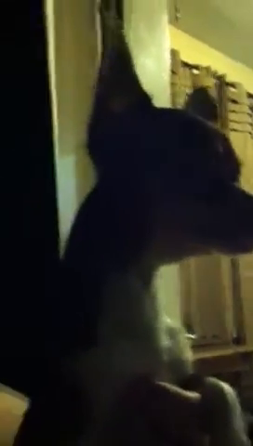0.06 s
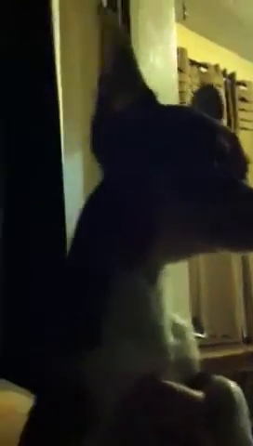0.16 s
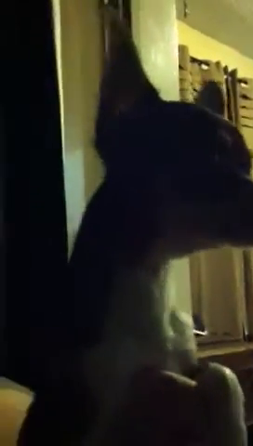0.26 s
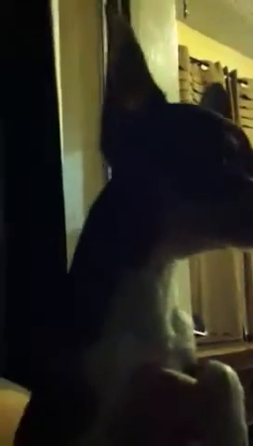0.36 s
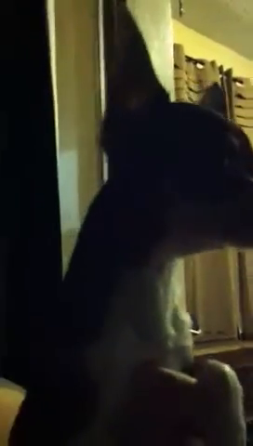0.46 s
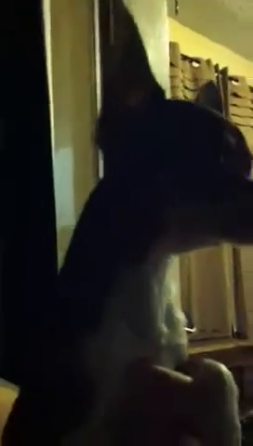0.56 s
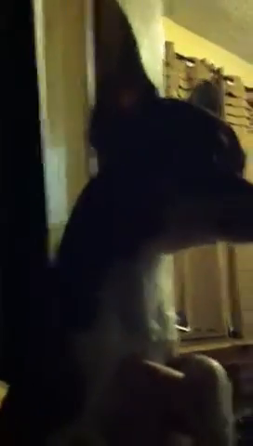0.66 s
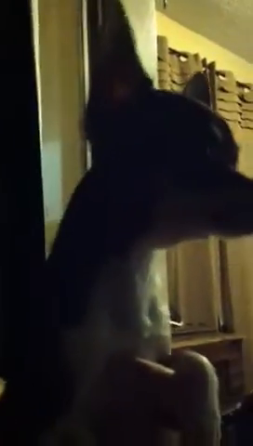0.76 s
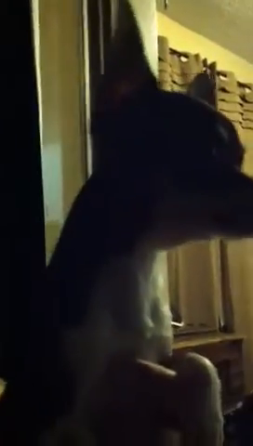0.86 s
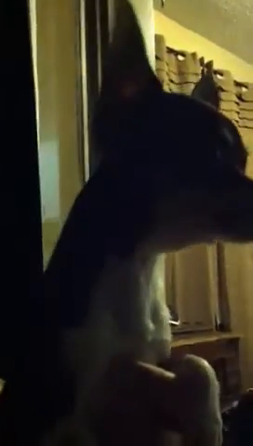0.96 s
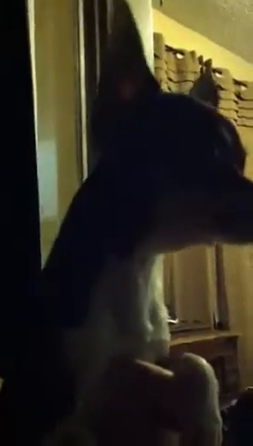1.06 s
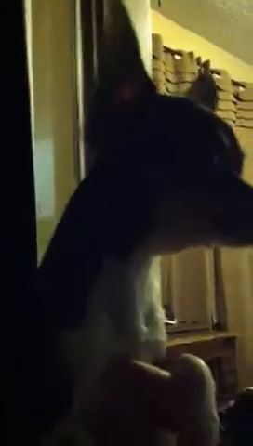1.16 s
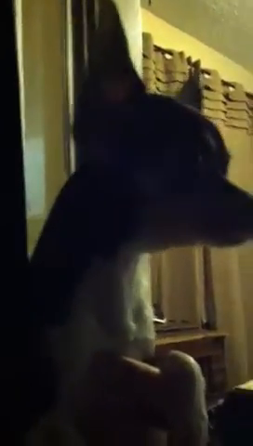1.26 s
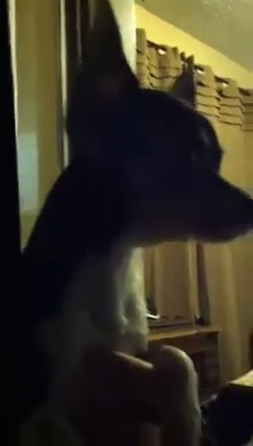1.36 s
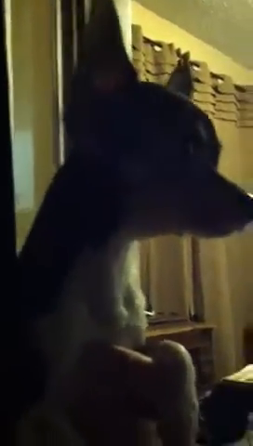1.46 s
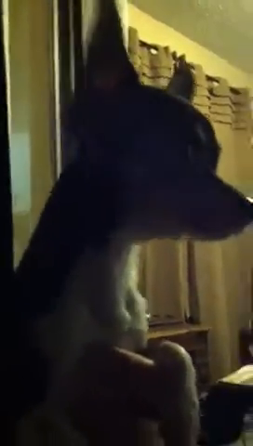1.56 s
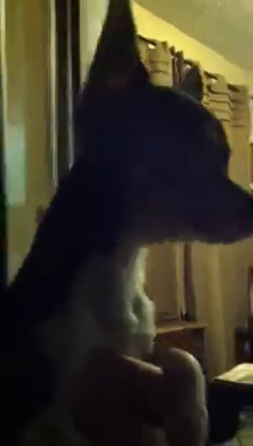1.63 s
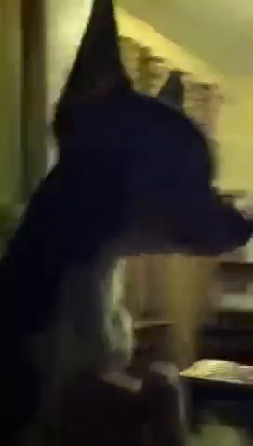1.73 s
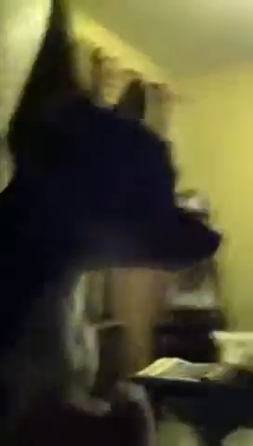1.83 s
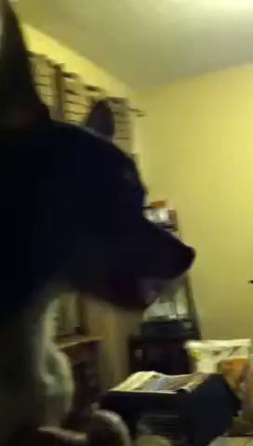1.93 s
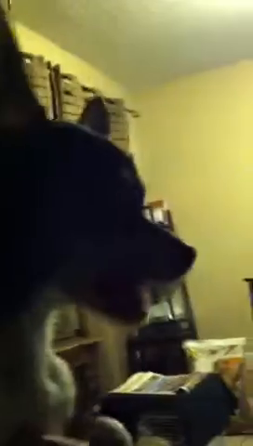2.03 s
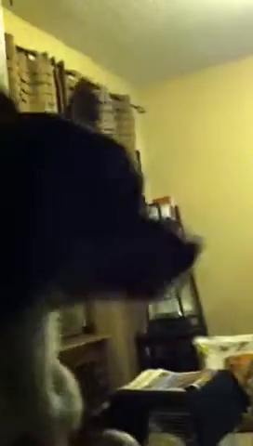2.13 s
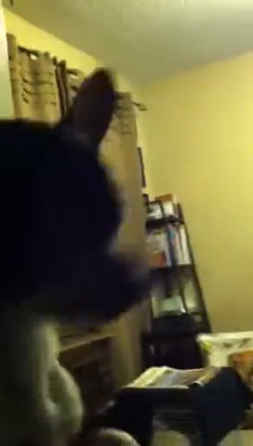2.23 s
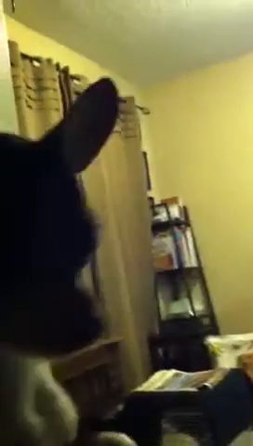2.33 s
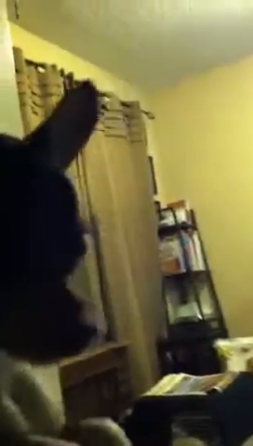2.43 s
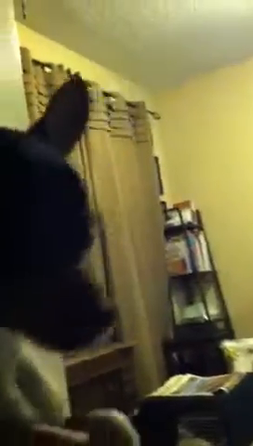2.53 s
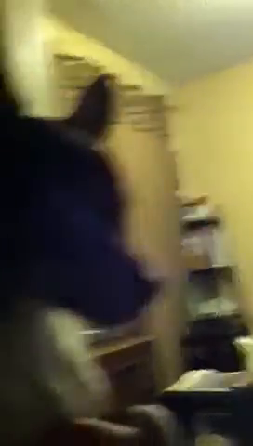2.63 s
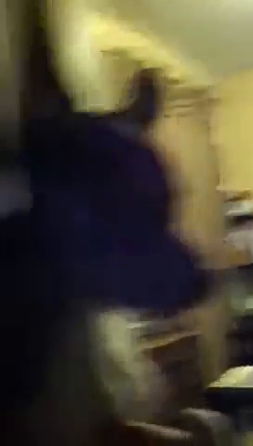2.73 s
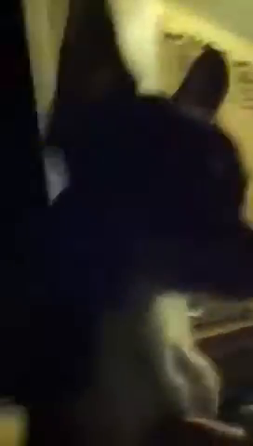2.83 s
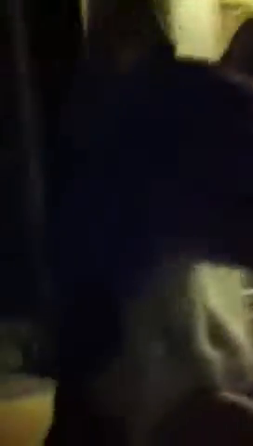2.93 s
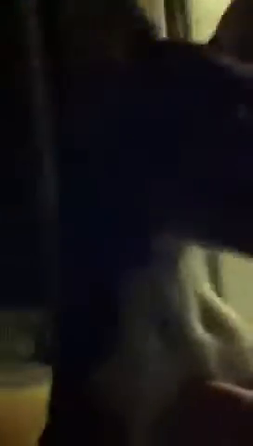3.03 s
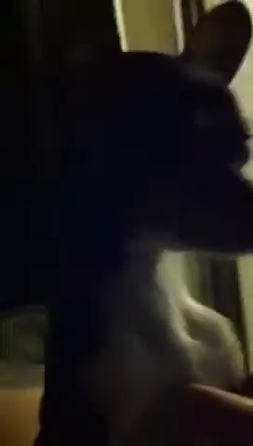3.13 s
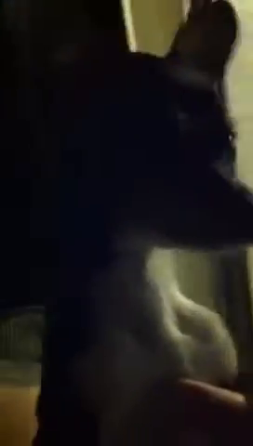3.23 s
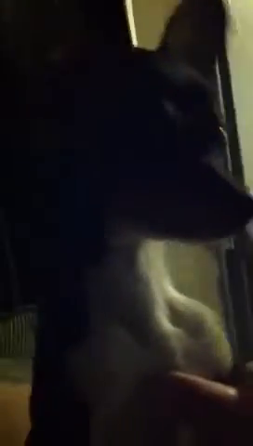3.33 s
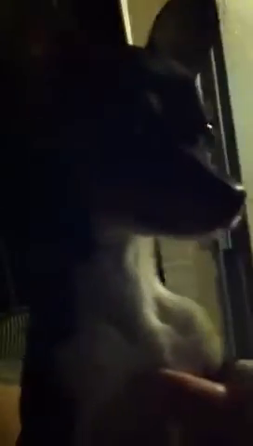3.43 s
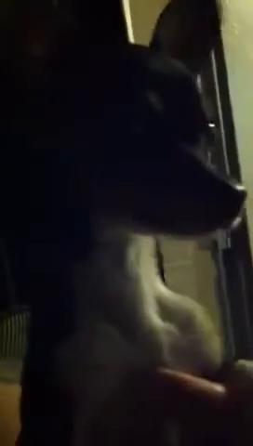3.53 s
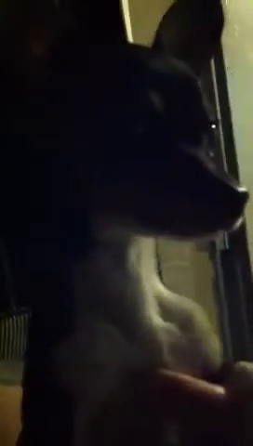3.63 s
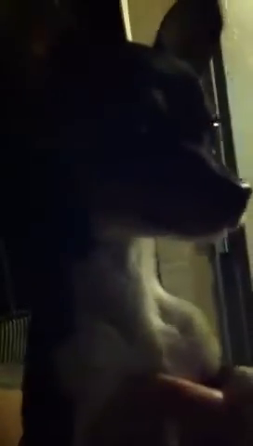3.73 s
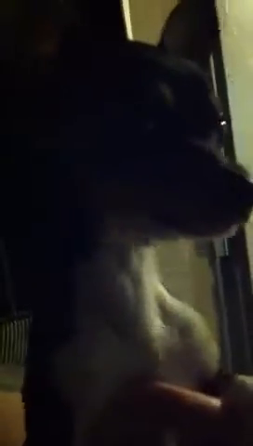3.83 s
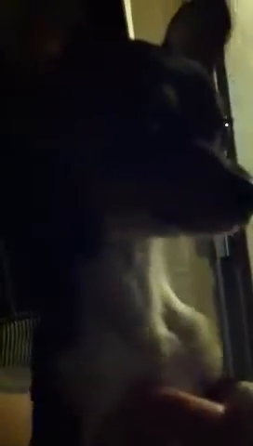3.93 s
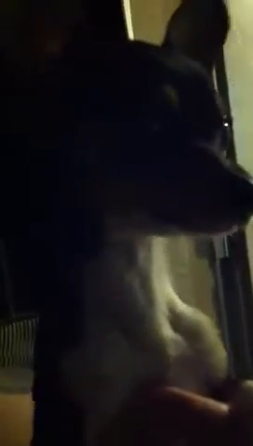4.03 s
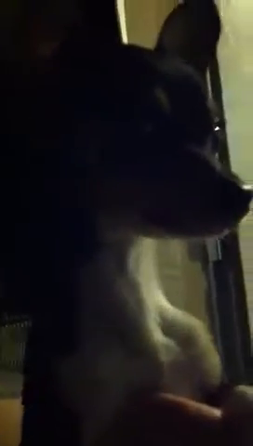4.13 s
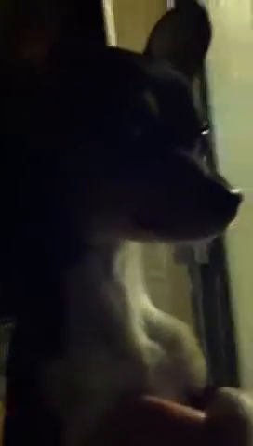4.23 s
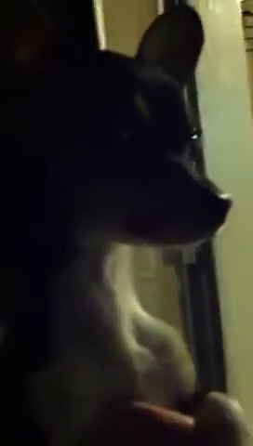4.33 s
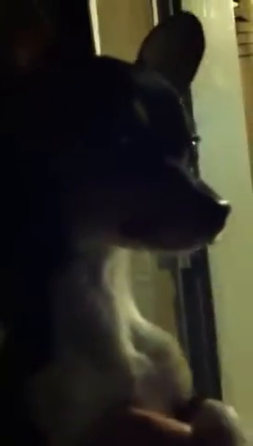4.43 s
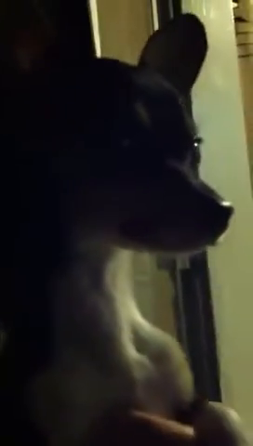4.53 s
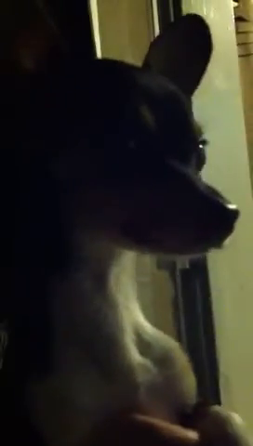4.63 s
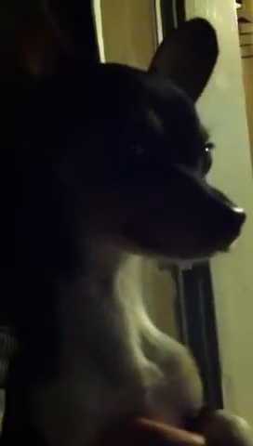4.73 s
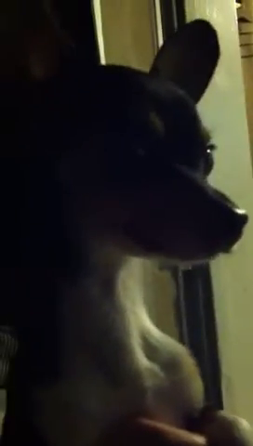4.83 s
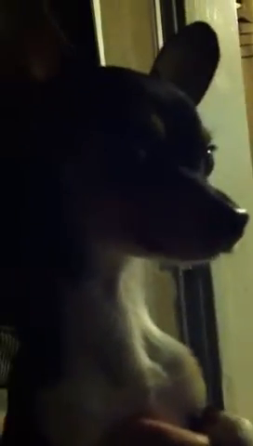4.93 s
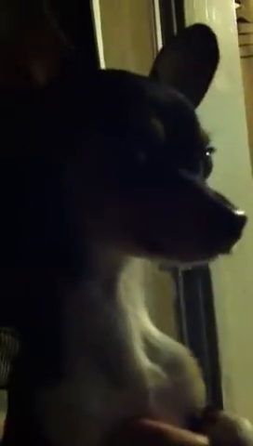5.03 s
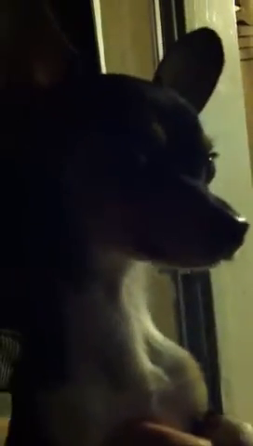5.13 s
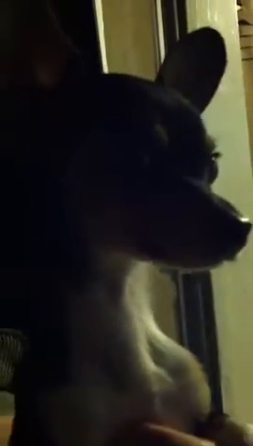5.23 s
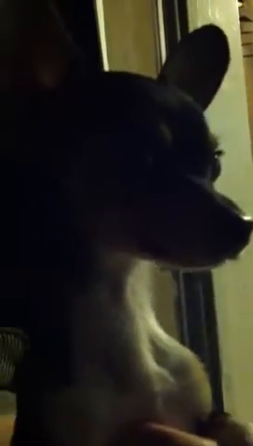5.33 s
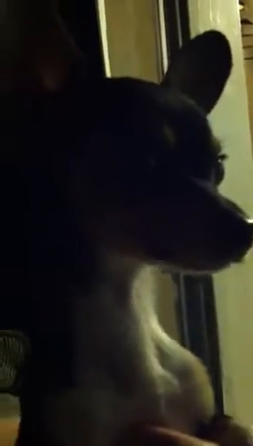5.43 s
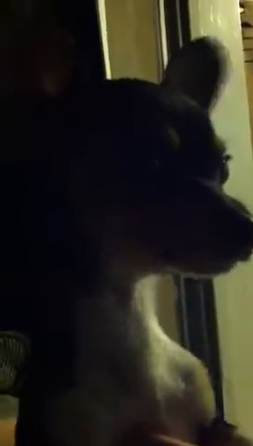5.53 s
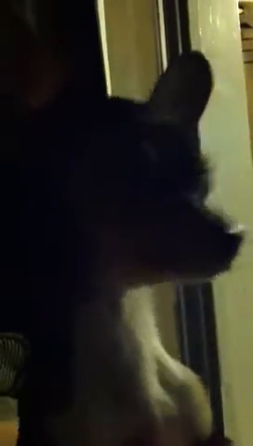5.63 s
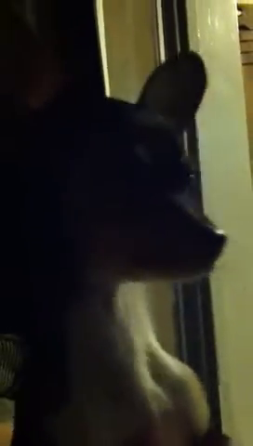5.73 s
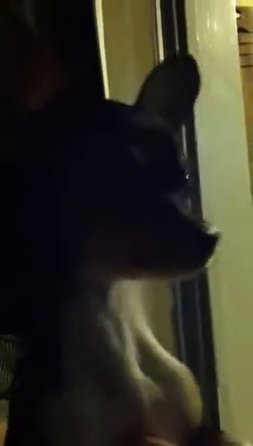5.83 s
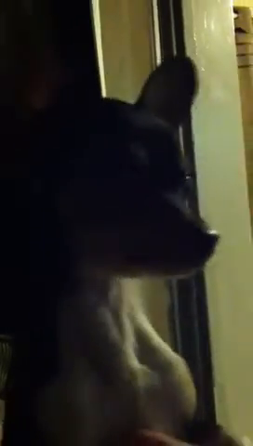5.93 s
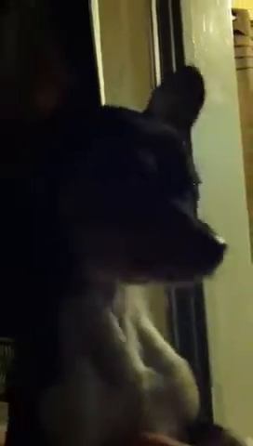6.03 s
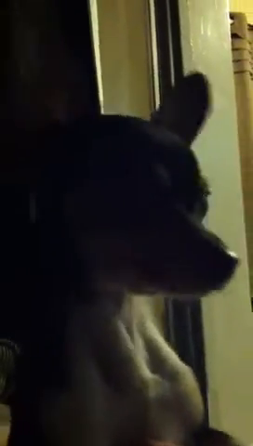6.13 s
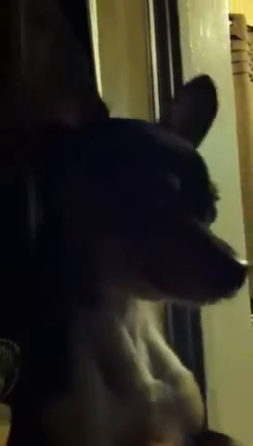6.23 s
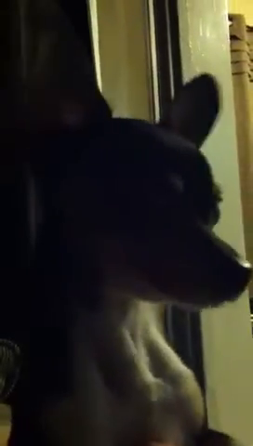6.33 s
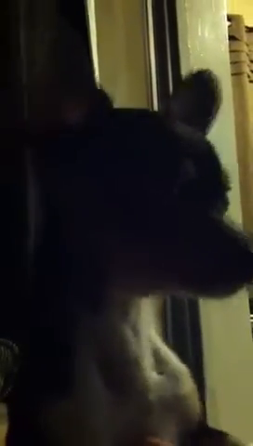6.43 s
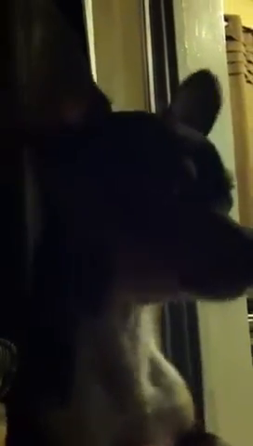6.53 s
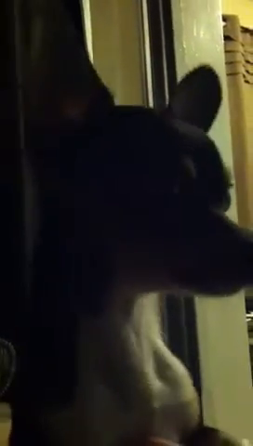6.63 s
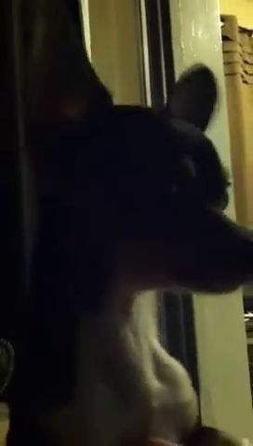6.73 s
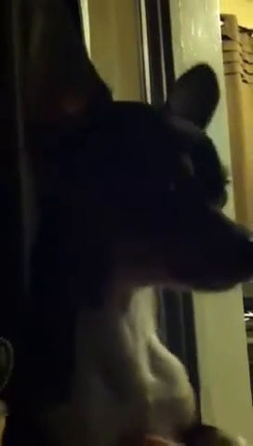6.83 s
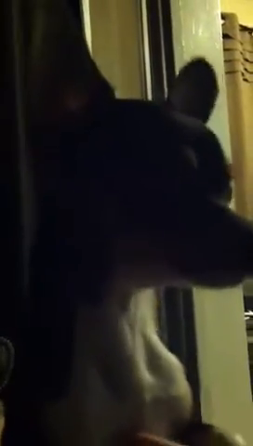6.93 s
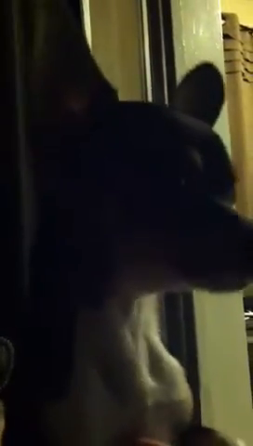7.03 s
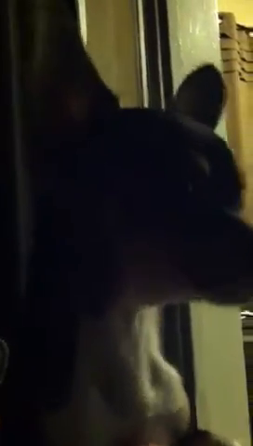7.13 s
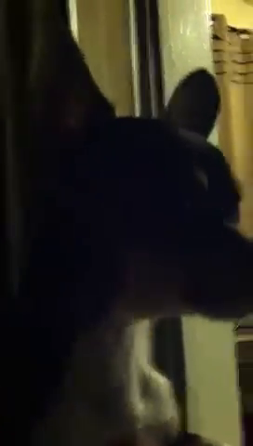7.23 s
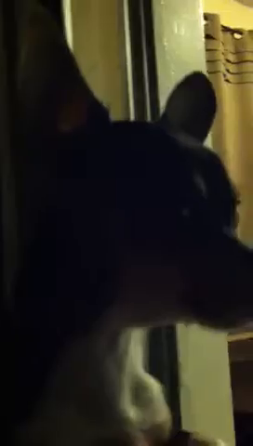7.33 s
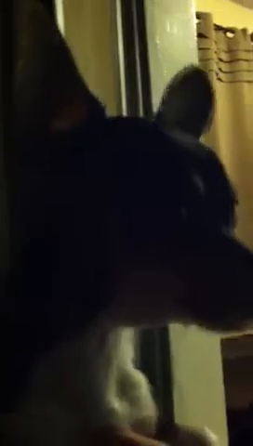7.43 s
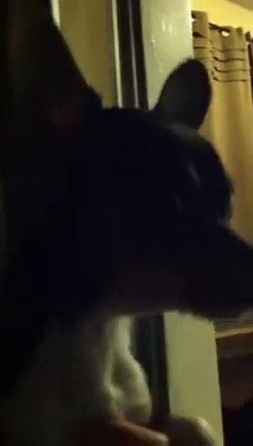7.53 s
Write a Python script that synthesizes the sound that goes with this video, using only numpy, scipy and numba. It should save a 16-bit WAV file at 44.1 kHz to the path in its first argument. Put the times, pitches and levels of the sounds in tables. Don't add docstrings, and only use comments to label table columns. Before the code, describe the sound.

Close, dry indoor sound of a small dog: a throaty growl fluttering about 25 times a second, then isolated muffled woofs with breathy ends and faint lip smacks in the gaps. The third and fourth woofs are higher and sharper, and the fourth runs almost straight into another growl. Soft room hiss and a distant appliance hum lie underneath.

```python
import sys
import numpy as np
from scipy import signal
from scipy.fft import rfft, irfft, next_fast_len
from scipy.io import wavfile
from scipy.ndimage import uniform_filter1d
from numba import njit

SR = 44100
rng = np.random.default_rng(int(sys.argv[2]) if len(sys.argv) > 2 else 0)


def ratio_of_db(decibels):
    return 10 ** (np.asarray(decibels, float) / 20)


def generate_wav(signal):
    frames = np.transpose(np.atleast_2d(signal))
    scaled = np.clip(frames, -1, 1) * 32767
    pcm = np.round(scaled).astype(np.int16)
    wavfile.write(sys.argv[1], SR, pcm)


N = 334278

# frequency in Hz, level in dB.
AIR_SPECTRUM = [(15, -52), (25, -44), (86, -21), (110, -14.5), (160, -13), (193, -2), (221, -5.5),
                (358, -7), (388, -10), (482, -9), (740, -8.5), (969, -12.5), (1170, -9.5), (3000, -17),
                (15500, -43)]
AIR_DB = -59.5
# frequency in Hz, level in dB.
APPLIANCE_TONES = [(118.4, -75), (193.8, -80), (387.6, -71), (452.2, -72.5), (732.1, -75), (1136, -73.5)]

# time in seconds, closures per second.
FLAPPING = [
    [(0, 25.84), (.25, 25.95), (.4, 22.18), (.7, 26.46), (1.34, 20.89)],
    [(6.604, 25.95), (7, 29.72), (7.1, 25.89), (7.3, 28.97), (7.58, 22.16)],
]
FIRST_CLOSURE_S = [.0184, 6.6165]
# time in seconds, pulse rate in Hz, peak level in dB.
GROWL_EFFORT = [
    [(0, 215.8, -25.5), (.12, 218, -25), (.23, 211.7, -26), (.3, 188.5, -27), (.48, 178.6, -30),
     (.63, 185.7, -28), (.73, 202.8, -26), (1.05, 187.8, -28.5), (1.25, 166.8, -29), (1.33, 124.8, -32.5)],
    [(6.6, 140.4, -25), (6.66, 138.9, -25), (6.78, 131.3, -23.5), (6.86, 165, -24.5), (6.96, 196, -23),
     (7.05, 185.9, -25), (7.3, 193.8, -24.5), (7.45, 195, -24), (7.58, 182.3, -24)],
]
SHUT_S = [.0085, .0105]
TAUT_HZ = 195
SLAP_CYCLES, FLAP_JITTER_S = 1.2, .001
SLAP_DB = [-4, -6.5]
SLAP_SPREAD_DB = 2.0
SLACK_LOSS_DB, SLACK_SPREAD_DB = 12, 7
THROB_DB = -29.5
# centre in Hz, width in Hz, dB with airway open, dB with airway pinched.
THROAT_1 = [(218, 44, -3.5, -26.5), (396, 101, 0, -4.5), (542, 627, -15.5, -9.5), (804, 78, -30, -1),
            (1006, 86, -7.5, -20.5), (1420, 680, -20.5, -18), (1640, 204, -24, -19.5)]
THROAT_2 = [(200, 55, -7.5, -59), (395, 59.5, -3, -3), (622, 80.5, -10, -2.5), (771, 62, -24.5, 0),
            (979, 47, -13.5, -10), (1228, 94, -17.5, -15.5), (1576, 460, -50, -30.5)]
# time in seconds, upper throat resonance in Hz, nose whistle in Hz.
POSTURE = [
    [(0, 2360, 8100), (.25, 2380, 8400), (.55, 2810, 9000), (.68, 2280, 8850), (.95, 2510, 8500),
     (1.22, 2780, 8550), (1.34, 2850, 8800)],
    [(6.6, 2400, 9050), (6.82, 2100, 8000), (6.97, 2310, 8040), (7.3, 2280, 8400), (7.58, 2160, 9200)],
]
# dB at the start, dB once settled, settling time in seconds.
UPPER_THROAT = [(-44, -21.5, 0.49), (-29, -22, .35)]
WHISTLE_DB = [-34, -41.5]
WHISTLE_PATCHY_DB = 0.6
# centre in Hz, width in Hz, dB relative to the whistle.
NOSE_SIDE_BANDS = [(6500, 1600, -6), (12100, 900, -26)]

# frequency in Hz, T60 in seconds.
ROOM_T60 = [(100, 0.45), (1000, 0.29), (4000, 0.3), (12000, .2)]
ROOM_DB = -7.5

# start in seconds, peak in seconds, hold in seconds, peak in dB, fade in dB per second.
PUFFS = [
    (2.082, 2.137, .004, -34.5, 441),
    (2.12, 2.144, 0.12, -49.5, 230),
    (3.792, 3.818, 0.026, -42, 206),
    (5.514, 5.568, 0.025, -36, 221),
    (6.444, 6.499, 0.0037, -37.5, 230),
]
# frequency in Hz, density in dB per Hz.
PUFF_COLOURS = [
    [(880, -22), (1500, -2.5), (2620, -4.5), (2910, -1.5), (3610, -4.5), (6000, -21), (8440, -8),
     (10200, -29), (12200, -23), (15500, -45)],
    [(880, -19), (1500, -11.5), (2520, -15), (2860, -37), (3180, -12), (4430, -11), (5130, -6.5),
     (6120, -21.5), (12500, -29.5), (15500, -43)],
    [(880, -22), (1500, -2), (1690, -24), (2400, 9.5), (2750, -1.5), (3940, 5), (4300, -1), (5230, 3.5),
     (6740, -5.5), (12400, -4.5), (15500, -39)],
    [(880, -59), (1500, 6), (2110, -2), (2800, -8), (3580, 1), (4700, -1), (5180, -0.5), (7080, -14),
     (8780, -5), (12600, -18), (15500, -37)],
    [(1180, -5), (2000, 12.5), (2250, -15), (2500, -25), (3150, 3), (3670, 2), (4140, -6), (7100, -8.5),
     (9250, 3), (11200, -15), (12900, -12), (13700, -47), (15500, -32)],
]
# start in Hz, end in Hz, width in Hz, level in dB.
PUFF_BANDS = [(3120, 7000, 97, 5.5), (5250, 5150, 150, -13), (3180, 5300, 1600, -1), (3360, 4000, 800, -7),
              (3340, 6500, 690, 3)]
SWELL_DB, SAG_DB_PER_S, DROP_DB, DROP_S, FADE_DB = 27.5, 35, 7, 0.0065, 32

# time in seconds, pitch in Hz, level in dB, mouth opening from 0 to 1.
WOOF_1 = [(2.087, 255, -40.5, .5), (2.096, 260.3, -16.5, 0.73), (2.109, 255.7, -22.5, 0.94),
          (2.123, 269, -16.5, 0.77), (2.133, 270, -31.5, 0.62), (2.159, 277, -38.5, 0.54)]
WOOF_2 = [(3.743, 111.8, -51.5, 0.28), (3.753, 122, -43, 0.54), (3.7598, 220, -29, 0.24),
          (3.785, 262.8, -25.5, 0.03), (3.8, 349, -20, 0.76), (3.811, 275, -24, 0.41),
          (3.830, 249, -39, 0.019), (3.852, 238, -38, .03)]
WOOF_3 = [(5.488, 91.4, -55.5, 0.49), (5.495, 209.7, -31, .35), (5.517, 300.1, -22, 0.12),
          (5.527, 401, -19, 0.88), (5.543, 394.6, -19, .75), (5.548, 490, -15.5, 0.87),
          (5.563, 508, -20.5, 1), (5.576, 353, -33, 0.48), (5.597, 348, -50, 0.32)]
WOOF_4 = [(6.424, 214.8, -42, 0.31), (6.440, 279.6, -21, 0.28), (6.450, 367.7, -17, 0.63),
          (6.463, 401.6, -25, 0.96), (6.478, 416, -21.5, 0.95), (6.492, 386.7, -24.5, 0.8),
          (6.507, 250, -27.5, 0.068), (6.524, 200, -44, 0.074), (6.551, 200, -55, 0.53)]
SHUT_HZ, OPEN_HZ = 490, 1087
SHUT_DB, OPEN_DB = -28, -1.5
RAGGED = [
    [(0, .1), (.2, .3), (.55, .4), (1, .85)],
    [(0, .04), (.35, .25), (.55, .04), (1, .6)],
    [(0, .05), (.4, .14), (.56, .4), (.75, .18), (1, .75)],
    [(0, .12), (.22, .4), (.32, .06), (.45, .45), (1, .98)],
]
# pitch in Hz, level in dB.
CHEST_GAIN = [(200, -11.5), (410, 3.5), (500, -8)]
# from in Hz, to in Hz, share of the woof taken.
CLIMBS = [(1500, 1850, .6), (1200, 1780, .6), (1400, 2350, .68), (1200, 2350, .38)]
# extra dB of the second resonance, dB of the fundamental.
STRENGTHS = [(-4.5, -3.5), (3.5, 0), (-1.5, -2), (-1.5, -2.5)]
# start in Hz, midway in Hz, end in Hz, level in dB, width in Hz.
THIRDS = [(3650, 3280, 4200, -17, 300), (3000, 2800, 4000, -32, 560), (2800, 3200, 2600, -21, 660),
          (2700, 3800, 4000, -21, 1000)]

# time in seconds, peak in dB, ring in Hz.
LIP_TICKS = [
    (2.377, -64, 3590),
    (2.4542, -50.5, 5250),
    (2.6943, -53, 5170),
    (3.6794, -63, 3730),
    (4.146, -58, 3910),
]


def columns(rows, t):
    s, *cols = np.transpose(rows)
    return [np.interp(t, s, c) for c in cols]


def resonance(x, hz, width_hz):
    r = np.exp(-np.pi * width_hz / SR)
    feedback = [1, -2 * r * np.cos(2 * np.pi * hz / SR), r * r]
    return signal.lfilter([(1 - r * r) / 2, 0, (r * r - 1) / 2], feedback, x + 1e-18)


@njit
def glide(x, cosine, r):
    y = np.zeros(len(x))
    for i in range(2, len(x)):
        y[i] = (1 - r * r) / 2 * (x[i] - x[i - 2]) + 2 * r * cosine[i] * y[i - 1] - r * r * y[i - 2]
    return y


def moving(x, hz, width_hz):
    return glide(x, np.cos(2 * np.pi * hz / SR), np.exp(-np.pi * width_hz / SR))


def butter(x, order, hz, kind="low"):
    return signal.sosfilt(signal.butter(order, hz, kind, fs=SR, output="sos"), x)


def coloured(points, size):
    hz, db = np.transpose(points)
    f = np.maximum(np.fft.rfftfreq(size, 1 / SR), 1)
    gain = ratio_of_db(np.interp(np.log(f), np.log(hz), db))
    x = irfft(rfft(rng.standard_normal(size)) * gain, size)
    return x / x.std()


def smoothed_noise(size):
    return uniform_filter1d(uniform_filter1d(rng.standard_normal(N), size=size), size=size)


def background():
    (mains_hz, mains_db), *others = APPLIANCE_TONES
    mains = ratio_of_db(mains_db + 2.5) * np.sin(2 * np.pi * mains_hz * np.arange(N) / SR)
    tones = np.zeros(N)
    for hz, db in others:
        tones += ratio_of_db(db + 33) * resonance(resonance(rng.standard_normal(N), hz, 9.2), hz, 9.2)
    return ratio_of_db(AIR_DB) * coloured(AIR_SPECTRUM, N) + mains + tones


def palate_flaps(flapping, first_s, effort, shut_s, slap_db):
    t = np.arange(flapping[0][0], flapping[-1][0], 1e-4)
    closures = np.cumsum(columns(flapping, t)[0]) * 1e-4
    closures -= np.interp(first_s, t, closures)
    chance = rng.standard_normal((40, 2))[:int(closures[-1]) + 1]
    slaps = np.interp(np.arange(len(chance)), closures, t) + FLAP_JITTER_S * chance[:, 0]
    rate, peak_db = columns(effort, slaps - .02)
    reopened = slaps[:-1] + shut_s * (TAUT_HZ / rate[1:]) ** 2
    free = np.r_[t[0] + .003, reopened]
    last = slaps - np.minimum(SLAP_CYCLES / rate, .0075)
    first = last - np.maximum(np.round((last - free) * rate), 1) / rate
    return np.transpose([first, last, slaps, rate, peak_db, slap_db + SLAP_SPREAD_DB * chance[:, 1]])


def burst_pulses(bursts, sweep, jitter, leak_db):
    full, thin = np.zeros(N), np.zeros(N)
    chance = rng.standard_normal((len(bursts), 2, 12))
    following = [row[0] for row in bursts[1:]] + [0]
    for (first, last, slap, rate, peak_db, slap_db), after, (late, size) in zip(bursts, following, chance):
        count = round((last - first) * rate)
        u = np.arange(count + 1) / count
        times = first + (last - first) * (u + sweep * u * (1 - u)) + jitter * late[:count + 1] / rate
        at = np.maximum(np.round((times - .0021) * SR).astype(int), 2)
        slack = max(1 - rate / TAUT_HZ, 0)
        uneven_db = (.9 + SLACK_SPREAD_DB * slack) * size[:count + 1]
        strength = ratio_of_db(peak_db + 38 - SLACK_LOSS_DB * slack * (1 - u) + uneven_db) * (1 - .3 * u)
        full[at] = strength * (.35 + .65 * np.sqrt(u))
        thin[at] = strength * (.95 - .65 * u)
        thin[round((slap - .0022) * SR)] = ratio_of_db(peak_db + slap_db + 42 - SLACK_LOSS_DB * slack * 1.5)
        leaks = np.linspace(slap, after, max(round((after - slap) * rate) + 1, 2))[1:-1]
        thin[np.round((leaks - .002) * SR).astype(int)] = ratio_of_db(peak_db + leak_db + 37)
    return full, thin


def growl(bursts, throat, posture, upper, sweep, jitter, rasp_db, leak_db):
    t = np.arange(N) / SR
    full, thin = burst_pulses(bursts, sweep, jitter, leak_db)
    pulses = full + thin
    gate = signal.lfilter([.012], [1, -.988], pulses)
    rasp = ratio_of_db(rasp_db) * gate * rng.standard_normal(N)
    tension = np.maximum(columns(bursts, t)[2] / 195, .86)
    wander = 1 + 1.6 * smoothed_noise(900)
    voice = np.zeros(N)
    for k, (hz, width_hz, full_db, thin_db) in enumerate(throat):
        drive = ratio_of_db(full_db) * full + ratio_of_db(thin_db) * (thin + rasp)
        shift = tension if k < 2 else wander
        voice += (-1) ** (k + 1) * moving(drive, hz * shift, width_hz)
    upper_hz = columns(posture, t)[0]
    start_db, settled_db, settling_s = upper
    upper_db = np.interp(t - posture[0][0], [0, settling_s], [start_db, settled_db])
    ring = ratio_of_db(upper_db - 16) * moving(moving(pulses + 6.7 * rasp, upper_hz, 290), upper_hz, 290)
    throb = ratio_of_db(THROB_DB) * butter(gate, 2, 70)
    return butter(voice, 2, [145, 2100], "band") + ring + throb, gate


def nose(posture, effort, whistle_db, gate):
    t = np.arange(N) / SR
    whistle_hz = columns(posture, t)[1]
    patches = smoothed_noise(700)
    level_db = columns(effort, t)[1] + whistle_db + WHISTLE_PATCHY_DB * patches / patches.std()
    beat = gate / (uniform_filter1d(gate, size=4000) + 1e-5)
    sounding = (t > effort[0][0]) * (t < effort[-1][0])
    hiss = (.5 + .5 * beat) * rng.standard_normal(N) * ratio_of_db(level_db - 1) * sounding
    bands = sum(ratio_of_db(db) * resonance(resonance(hiss, f, w), f, w) for f, w, db in NOSE_SIDE_BANDS)
    return moving(moving(hiss, whistle_hz, 800), whistle_hz, 800) + bands


def room(x):
    size = next_fast_len(N + SR)
    f = np.maximum(np.fft.rfftfreq(size, 1 / SR), 1)
    hz, seconds = np.transpose(ROOM_T60)
    t60 = np.interp(np.log(f), np.log(hz), seconds)
    echo = 0
    for k, lag in enumerate(rng.uniform(.015, .06, 20)):
        loop = ratio_of_db(-60 * lag / t60) * np.exp(-2j * np.pi * f * lag)
        echo = echo + (-1) ** k * loop / (1 - loop)
    for lag in (.0017, .0047):
        delay = np.exp(-2j * np.pi * f * lag)
        echo = echo * (delay - .6) / (1 - .6 * delay)
    echo = echo * np.sqrt(20) * ratio_of_db(-5.5) / np.sqrt(uniform_filter1d(abs(echo) ** 2, size=90))
    echo = echo * f / np.hypot(f, 600)
    return irfft(rfft(x, size) * echo, size)[:N] / np.sqrt(20)


def puff(row, colour, band):
    t = np.arange(N) / SR
    start, peak, hold, peak_db, fade_rate = row
    from_hz, to_hz, width_hz, band_db = band
    times = np.cumsum([start, peak - start, hold, DROP_S, FADE_DB / fade_rate])
    level_db = np.cumsum([peak_db - SWELL_DB, SWELL_DB, -SAG_DB_PER_S * hold, -DROP_DB, -FADE_DB])
    end = times[-1]
    fade = np.clip(np.minimum(t - start, end - t) / 0.0021, 0, 1)
    air = coloured(colour, N)
    shaped = air + ratio_of_db(band_db) * moving(air, np.interp(t, [start, end], [from_hz, to_hz]), width_hz)
    return fade * ratio_of_db(np.interp(t, times, level_db)) * shaped


def woof(rows, climb, strengths, ragged, third):
    start = round(rows[0][0] * SR)
    t = np.arange(start, start + 9000) / SR
    end_s = rows[-1][0]
    pitch, level_db, opening = columns(rows, t)
    extra_db, chest_db = strengths
    done = np.clip((t - t[0]) / (end_s - t[0]), 0, 1)
    rough = columns(ragged, done)[0]

    pulses, i = np.zeros(len(t)), 0
    for late, size in rng.uniform(-1, 1, (80, 2)):
        if t[i] < end_s:
            period = SR / pitch[i]
            pulses[i] = period * ratio_of_db(level_db[i] - 5 + 6 * rough[i] * size)
            i += round(period * (1 + .3 * rough[i] * late))
    gate = signal.lfilter([.02], [1, -.98], pulses)
    source = pulses + rough * 7 * gate * rng.standard_normal(len(t))

    chest = ratio_of_db(chest_db + columns(CHEST_GAIN, pitch)[0]) * moving(source, np.maximum(pitch, 220), 244)
    first_hz = SHUT_HZ + (OPEN_HZ - SHUT_HZ) * opening
    first = moving(moving(source, first_hz, 370), first_hz, 315)
    lows = butter(first - chest, 4, 1500)
    second_hz = np.interp(done, [0, climb[2]], climb[:2])
    second_db = SHUT_DB + (OPEN_DB - SHUT_DB) * opening + extra_db
    second = ratio_of_db(second_db) * moving(moving(source, second_hz, 450), second_hz, 440)
    *third_path, third_db, width_hz = third
    third_hz = np.interp(t, np.linspace(rows[0][0], end_s, 3), third_path)
    top = ratio_of_db(third_db + 0.8 * second_db) * moving(moving(source, third_hz, width_hz), third_hz, width_hz)
    out = np.zeros(N)
    out[start:start + len(t)] = butter(second - lows - top, 4, 170, "high")
    return out


def lip_ticks():
    out = np.zeros(N)
    for s, peak_db, hz in LIP_TICKS:
        click = np.zeros(N)
        click[round(s * SR)] = ratio_of_db(peak_db + 32.5)
        out += resonance(click, hz, 380) + ratio_of_db(-33) * resonance(click, 8000, 7000)
    return out


def scene():
    flap_settings = zip(FLAPPING, FIRST_CLOSURE_S, GROWL_EFFORT, SHUT_S, SLAP_DB)
    bursts_1, bursts_2 = (palate_flaps(*part) for part in flap_settings)
    growl_1, gate_1 = growl(bursts_1, THROAT_1, POSTURE[0], UPPER_THROAT[0],
                            sweep=.15, jitter=.05, rasp_db=1, leak_db=-3)
    growl_2, gate_2 = growl(bursts_2, THROAT_2, POSTURE[1], UPPER_THROAT[1],
                            sweep=.13, jitter=.03, rasp_db=-3, leak_db=-15)
    noses = sum(nose(*part) for part in zip(POSTURE, GROWL_EFFORT, WHISTLE_DB, (gate_1, gate_2)))
    calls = zip((WOOF_1, WOOF_2, WOOF_3, WOOF_4), CLIMBS, STRENGTHS, RAGGED, THIRDS)
    dog = growl_1 + growl_2 + noses + sum(woof(*call) for call in calls)
    air = sum(puff(*rush) for rush in zip(PUFFS, PUFF_COLOURS, PUFF_BANDS))
    return (dog + ratio_of_db(ROOM_DB) * room(dog) + air + lip_ticks() + background())[None]


def low_pass(x):
    return signal.sosfilt(signal.butter(12, 15610, fs=SR, output="sos"), x)


def record(dry):
    thin = butter(dry, 1, 18, "high")
    rounded = .6 * np.tanh(thin / .6)
    return low_pass(rounded)


dry = scene()
out = record(dry)
generate_wav(out)
```